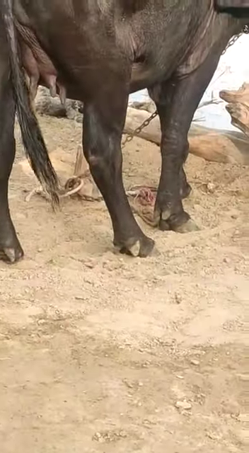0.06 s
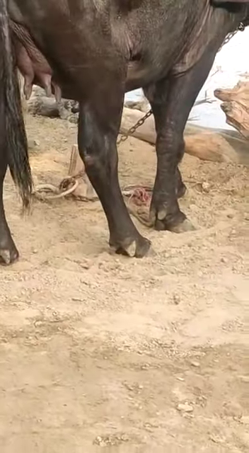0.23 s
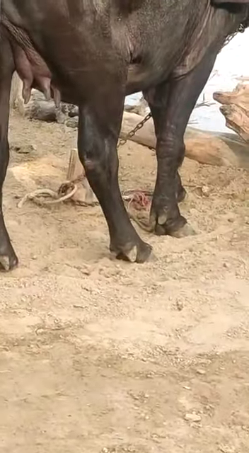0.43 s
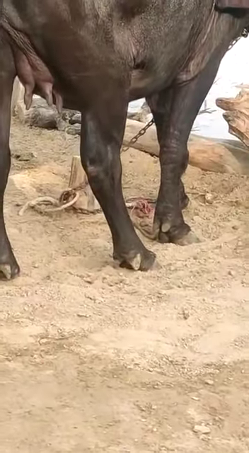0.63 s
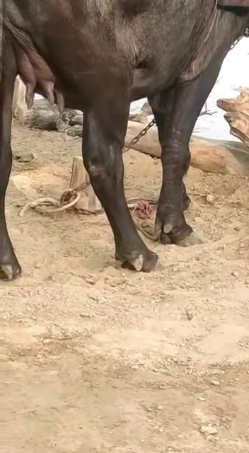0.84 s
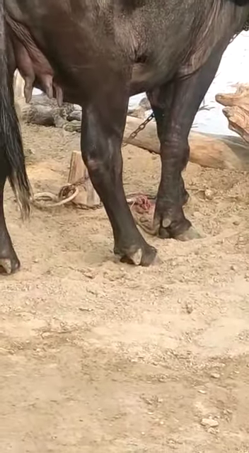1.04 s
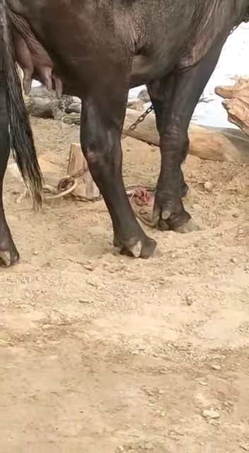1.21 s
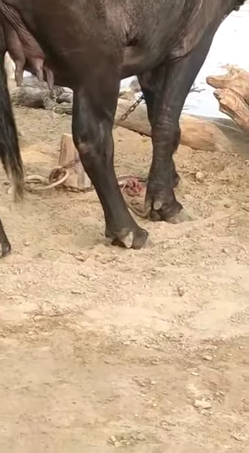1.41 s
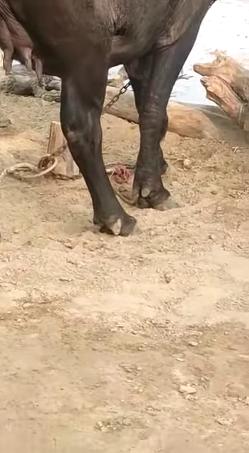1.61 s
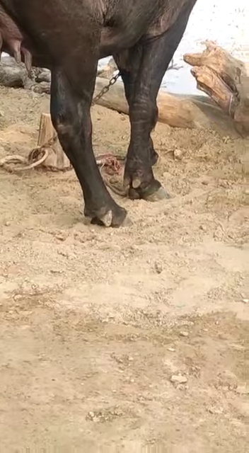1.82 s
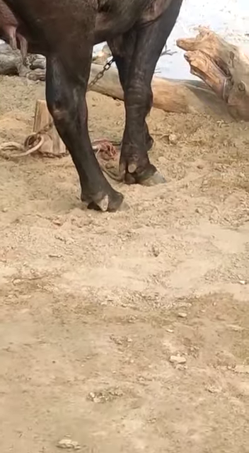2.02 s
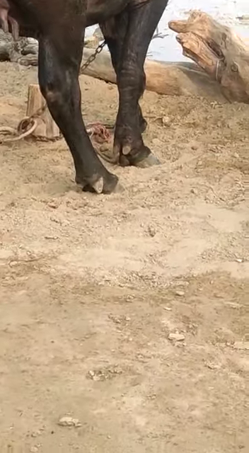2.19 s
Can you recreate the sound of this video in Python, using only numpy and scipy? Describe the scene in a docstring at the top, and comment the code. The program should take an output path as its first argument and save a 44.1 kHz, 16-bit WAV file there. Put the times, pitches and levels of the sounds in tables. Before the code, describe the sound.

A buffalo bellows once in an open yard, low and hoarse, briefly finding a clear pitch before breaking into rasping breath. Faint distant rumble and light wind on the microphone continue underneath, with two soft, dull thumps.

```python
"""One low, hoarse bellow from a tethered buffalo fills an open yard.
Its vocal folds flap unevenly into the resonances of throat and mouth, catch on a clear pitch midway,
then break up into rushing air. Walls throw the call back. Behind it are a distant outdoor rumble,
light wind on the microphone, a tiny tick, a scuff and two dull thumps."""
import sys
import numpy as np
from scipy import signal
from scipy.fft import rfft, irfft
from scipy.io import wavfile
from scipy.ndimage import uniform_filter1d

SR = 44100
rng = np.random.default_rng(int(sys.argv[2]) if len(sys.argv) > 2 else 0)


def int16_out(signal):
    """Quantize to a 16-bit WAV file."""
    q = np.round(np.clip(np.atleast_2d(signal).T, -1, 1) * 32767)
    wavfile.write(sys.argv[1], SR, q.astype(np.int16))


N = 103635
T = np.arange(N) / SR
FREQS = np.fft.rfftfreq(2 * N, 1 / SR)
AIR_SPREAD = 0.8   # side against mid amplitude of the breath

# Envelopes of the bellow's six bands. Each row: time in seconds, relative level in dB.
LOW_LEVEL = [(0.17, -59), (0.314, -37.5), (0.572, -36), (0.726, -37.5), (0.81, -33), (.88, -38.5),
             (.96, -33.5), (1.0, -38.5), (1.26, -40.5), (1.32, -52.5), (1.4, -40.5), (1.5, -46),
             (1.62, -60)]
MID_LEVEL = [(0.17, -65), (0.282, -41.5), (0.444, -37), (0.694, -35.5), (0.77, -29.5), (0.872, -41),
             (0.94, -37.5), (1.006, -40), (1.25, -42.5), (1.3, -42), (1.356, -38), (1.396, -52),
             (1.438, -49), (1.62, -72)]
HIGH_LEVEL = [(0.17, -75), (0.206, -51.5), (0.25, -39), (0.346, -32), (0.448, -34), (0.48, -29),
              (0.614, -36), (0.82, -40), (0.84, -37), (1.236, -36), (1.26, -39.5), (1.356, -37),
              (1.526, -50.5), (1.62, -64.5)]
RASP_LEVEL = [(0.17, -89), (0.246, -49), (0.33, -41), (0.362, -40.5), (0.392, -35), (0.512, -42.5),
              (0.586, -38), (0.726, -48), (0.904, -43), (1.13, -51.5), (1.174, -46.5), (1.478, -55.5),
              (1.62, -75.5)]
AIR_LEVEL = [(0.17, -70.5), (0.28, -48), (0.37, -49.5), (0.416, -56), (0.524, -45.5), (0.808, -58),
             (0.88, -45.5), (0.936, -64), (0.972, -48.5), (1.308, -51.5), (1.404, -54), (1.43, -48),
             (1.462, -59), (1.474, -49.5), (1.62, -83)]
HISS_LEVEL = [(0.17, -78), (0.298, -57), (0.71, -51.5), (0.792, -66.5), (0.86, -54.5), (0.928, -58),
              (1.078, -52), (1.202, -62), (1.295, -51), (1.316, -59.5), (1.404, -60), (1.439, -46.5),
              (1.458, -67), (1.49, -53.5), (1.51, -64), (1.62, -74)]
# Broad spectra of the same bands. Each row: frequency in Hz, relative gain in dB.
LOW_SHAPE = [(110, -11.5), (200, -7.5), (260, 1.5), (315, -5), (370, -17), (460, -17.5), (600, -57)]
MID_SHAPE = [(470, -31), (525, -8), (590, 1), (700, 5), (790, -12), (870, -11), (1050, -53)]
HIGH_SHAPE = [(680, -27), (800, -2), (900, -1), (1020, 3.5), (1100, -1), (1250, -1.5), (1430, -1.5),
              (1600, -8), (1850, -57)]
RASP_SHAPE = [(1400, -42), (1660, 3), (1850, 0.5), (2200, -1), (2380, -6.5), (2620, -19), (2950, -8.5),
              (3400, -35), (5000, -65)]
AIR_SHAPE = [(1200, 4), (2500, 0.5), (3100, 5), (3550, -2), (3950, 0.5), (4800, -3), (5800, -21.5),
             (6800, -48)]
HISS_SHAPE = [(5200, -9.5), (6200, -8.5), (7000, -2.5), (7700, -2), (8300, 2.5), (9000, 1), (9600, -4.5),
              (11000, -9.5), (13000, -13), (15000, -20)]
# Vibration of the vocal folds. Each row: time in seconds, pitch in Hz, clearness from 0 to 1.
FOLDS = [(.2, 136.2, 0), (.33, 140.4, 0.04), (.46, 142.6, 0.03), (.56, 137.7, 0.55), (.68, 138.7, 0.89),
         (.77, 138.6, 0.98), (.87, 136.7, 0.81), (.95, 137.9, 0.93), (1.0, 135.4, .2), (1.25, 140.5, 0.01),
         (1.36, 147.6, 0.14), (1.45, 149.1, 0.04)]
# Partials of the clear voice. Each row: harmonic number, relative level in dB.
LOW_PARTIALS = [(2, 0)]
MID_PARTIALS = [(4, -17), (5, 2)]
HIGH_PARTIALS = [(6, 4), (7, 1.5), (8, -8), (9, -11), (10, -2)]
# Rings of the throat (middle band, climbing as the mouth opens) and of the mouth (high band).
# Each row: time in seconds, centre in Hz, share of power against the rough voice from 0 to 1.
THROAT_RING = [(.25, 603, 0.6), (.38, 603, 0.7), (.46, 625, 0.48), (.57, 657, 0.7), (.68, 668, 0.6),
               (.8, 685, 0.22), (1.1, 692, 0.51), (1.29, 714, 0.71), (1.37, 703, 0.93), (1.5, 705, 0.2)]
MOUTH_RING = [(.26, 1005, 0.25), (.38, 945, 0.25), (.46, 930, 0.4), (.55, 928, 0.42), (.7, 949, 0),
              (.9, 1005, 0), (1.02, 1002, 0.22), (1.17, 1007, 0.5), (1.27, 1006, 0.07), (1.37, 1002, 0.34),
              (1.5, 1013, 0.14)]
# What the mouth passes of the hard slaps. Each row: frequency in Hz, gain in dB.
MOUTH_PASSBAND = [(500, -33), (700, 0), (3000, -0.5), (4000, -24)]
# Throb of the folds. Each row: time in seconds, modulation depth from 0 to 1.
GROWL_DEPTH = [(.4, .36), (.56, .3), (.8, .13), (1.05, .2)]
# Wheeze in the breath. Each row: time in seconds, centre in Hz, level in dB.
WHEEZE = [(.24, 6400, -69), (0.329, 6400, -53.5), (.45, 6490, -57.5), (0.499, 6500, -50.5),
          (.58, 5866, -60), (.68, 5780, -58), (.8, 5030, -64), (1.03, 5040, -57.5), (1.29, 4963, -56.5),
          (1.42, 4850, -62.5), (1.52, 4820, -75)]
# Brief overtones. Each row: peak time and half-length in seconds, centre and width in Hz, level in dB.
WHISTLES = [(0.323, 0.075, 895, 6.6, -39.5), (0.317, .04, 694, 6.6, -39), (0.358, 0.024, 1200, 9.5, -43),
            (0.455, 0.097, 778, 5.5, -37.5), (0.555, 0.048, 1421, 2.3, -52), (.95, 0.042, 692, 5.1, -38.5),
            (1.393, 0.042, 303, 5.4, -42), (1.439, 0.043, 1590, 11, -45.5), (1.428, 0.018, 8700, 260, -53),
            (1.483, 0.022, 8900, 190, -51)]
# Narrow, steady ringing pitches that reflections in the yard add to the bellow.
# Each row: centre in Hz, width in Hz, lift in dB.
YARD_RESONANCES = [(240.7, 6.7, 9), (279.3, 9.8, 9.5), (304.1, 5.2, 5.5), (605, 7.7, 7.5), (657, 9.5, 9.5),
                   (698.2, 8.8, 14), (772, 9.1, 6.5), (897, 11, 10), (954, 5.6, 7), (974, 7.9, 6),
                   (1012.7, 11.2, 11), (1124, 13, 9), (1438, 5.1, 8.5), (1895, 17, 10), (2128, 5.3, 10.5),
                   (2278, 10, 11)]
# Colour of the echoes, and of the call's left channel. Each row: frequency in Hz, gain in dB.
ECHO_SHAPE = [(250, -22.5), (600, -5.5), (1200, -2), (2500, 0.5), (5000, -0.5), (12000, -2)]
LEFT_LIFT = [(300, 0), (700, -0.5), (1100, 1.5), (2500, 0.5), (3100, -1), (4400, 3.5), (5600, 1.5),
             (7200, 3), (10000, 1)]
# Spectra of the scuff, the distant rumble, its side against its mid, and the wind.
# Each row: frequency in Hz, relative gain in dB.
SCUFF_SHAPE = [(300, -23), (650, 8), (1300, 2), (2500, -24), (8000, -39)]
RUMBLE_SHAPE = [(41, -13), (70, -2.5), (115, 2), (134, -9.5), (197, -5), (269, -13.5), (301, -15.5),
                (413, -13.5), (451, -25.5), (692, -27), (809, -27), (1700, -34), (2030, -40),
                (10200, -42.5), (15000, -50.5)]
RUMBLE_SIDE = [(70, -38), (250, -18.5), (700, -10), (2000, -1.5), (6000, 0)]
WIND_SHAPE = [(3, -44), (10, -9), (20, -3), (38, 6), (54, -4), (100, -32), (300, -67), (1000, -100)]
# Slow swell of the rumble. Each row: time in seconds, gain in dB.
RUMBLE_SWELL = [(0, 0.5), (1.75, 1), (2.35, -1)]
# Thumps on the microphone. Each row: start in seconds, peak before filtering in dB, rise in seconds.
THUMPS = [(1.0069, -23.5, 0.00089), (1.86, -34, 0.0097)]


def bellow():
    """Source and filter: the folds drive four voiced bands and pulse two bands of turbulent breath."""
    pitch, clear = in_time(FOLDS)
    source, gate = rough_folds(pitch, clear)
    low, mid, high, rasp = vocal_tract(yard_colour(source), pitch, clear)
    airflow = gate * stereo(rng.standard_normal(N), AIR_SPREAD * rng.standard_normal(N))
    air, hiss = [evened(coloured(airflow, shape)) for shape in (AIR_SHAPE, HISS_SHAPE)]
    bands = [(low, LOW_LEVEL, -0.5), (mid, MID_LEVEL, 1), (high, HIGH_LEVEL, -0.5),
             (rasp, RASP_LEVEL, -0.5), (air, AIR_LEVEL, 0), (hiss, HISS_LEVEL, 0)]
    return sum(from_db(trim_db) * envelope(level) * band for band, level, trim_db in bands) + wheeze(gate)


def rough_folds(pitch, clear, jitter=0.3, slap_s=0.0018, flutter_db=2):
    """Aperiodic vibration: uneven slaps gate puffs of turbulence. Returns the sound and the gate."""
    cycles = np.cumsum(pitch * np.exp(jitter * (1 - clear / 2) * drift(90))) / SR
    slaps = np.diff(np.floor(cycles), prepend=0)
    puffs = unit_power(lowpass(slaps, 1 / (2 * np.pi * slap_s)))
    gate = (1 + 0.64 * puffs) * from_db(flutter_db * drift(53))
    turbulence = unit_power(gate * rng.standard_normal(N))
    return unit_power(slaps) + turbulence, gate


def vocal_tract(source, pitch, clear):
    """Resonance shapes the slaps into four bands; the lower three give way to rings or clear partials."""
    shapes = (LOW_SHAPE, MID_SHAPE, HIGH_SHAPE, RASP_SHAPE)
    low, mid, high, rasp = [evened(coloured(source, shape)) for shape in shapes]
    low_tone, mid_tone, high_tone = clear_folds(pitch)
    throat_hz, throat_share = in_time(THROAT_RING)
    mouth_hz, mouth_share = in_time(MOUTH_RING)
    low = blend(low, low_tone, clear)
    mid = blend(mid, ringing(throat_hz, width_hz=7.3), throat_share)
    mid = blend(mid, mid_tone, clear ** 4)
    high = blend(high, ringing(mouth_hz, width_hz=5.1), mouth_share)
    high = blend(high, high_tone, 0.55 * clear ** 2)
    return growl(pitch) * np.array([low, mid, rounded(high), rounded(rasp)])


def clear_folds(pitch, waver=0.0039, sag_share=0.065, sag_at_s=0.83, sag_width_s=0.05):
    """Periodic vibration gives three groups of harmonics; the highest sags out of tune midway."""
    phase = 2 * np.pi * np.cumsum(pitch * (1 + waver * drift(23.36))) / SR
    sag = sag_share * (1 + np.tanh((T - sag_at_s) / sag_width_s)) / 2
    sagging = phase - 2 * np.pi * np.cumsum(pitch * sag) / SR
    groups = [(LOW_PARTIALS, phase), (MID_PARTIALS, phase), (HIGH_PARTIALS, sagging)]
    return [unit_power(sum(from_db(db) * np.sin(k * angle) for k, db in partials))
            for partials, angle in groups]


def rounded(band, limit=2.2):
    """Saturation rounds the hardest slaps, and the mouth band-limits the result."""
    return coloured(evened(np.tanh(band / limit)), MOUTH_PASSBAND)


def growl(pitch, throbs_per_cycle=0.29, jitter=0.24):
    """Amplitude modulation: a gain that makes the folds slap hardest every fourth cycle or so."""
    phase = 2 * np.pi * np.cumsum(throbs_per_cycle * pitch * np.exp(jitter * drift(23.2))) / SR
    depth = in_time(GROWL_DEPTH)[0]
    return (1 + depth * np.cos(phase)) / np.sqrt(1 + depth ** 2 / 2)


def wheeze(gate, width_hz=920):
    """A heavily damped resonance of the breath sinks in frequency, pulsed by the folds."""
    hz = in_time(WHEEZE)[0]
    air = stereo(ringing(hz, width_hz), AIR_SPREAD * ringing(hz, width_hz))
    return envelope([(s, db) for s, _, db in WHEEZE]) * evened(gate * air)


def whistles():
    """Narrow resonances flare up within the call, each under a Gaussian envelope."""
    return sum(from_db(db) * np.exp(-((T - peak_s) / half_length) ** 2) * ringing(hz, width)
               for peak_s, half_length, hz, width, db in WHISTLES)


def ringing(hz, width_hz):
    """A resonance stirred by turbulence gives narrow-band noise, whose centre may move."""
    amplitude = drift(width_hz) + 1j * drift(width_hz)
    carrier = np.exp(2j * np.pi * np.cumsum(hz * np.ones(N)) / SR)
    return evened((amplitude * carrier).real)


def yard_colour(source):
    """Interference of the yard's reflections lifts narrow, steady pitches, modelled as resonances."""
    lifts = sum((from_db(db) - 1) * resonance(hz, width) for hz, width, db in YARD_RESONANCES)
    return filtered(source, 1 + lifts)


def yard(call, t60_s=0.095, echo_delay_s=0.0026, left_lag_s=0.00006):
    """Reflection: a short scatter off walls and ground follows the slightly off-centre direct sound."""
    scatter = rng.standard_normal((2, N)) * from_db(-60 * T / t60_s) * (T > echo_delay_s)
    mid, side = scatter / np.sqrt(np.sum(scatter ** 2, axis=1, keepdims=True))
    impulse_response = stereo(from_db(-4) * mid, from_db(-5.5) * side)
    left_echo, right_echo = coloured(filtered(call, rfft(impulse_response, 2 * N)), ECHO_SHAPE)
    left_direct = filtered(call[0], np.exp(-2j * np.pi * FREQS * left_lag_s))
    return np.array([coloured(left_direct + left_echo, LEFT_LIFT), call[1] + right_echo])


def thumps():
    """Critically damped pulses on the microphone sound dull; a 25 Hz high-pass removes their offset."""
    pulses = np.zeros(N)
    for start_s, db, rise_s in THUMPS:
        age = np.maximum(T - start_s, 0) / rise_s
        pulses += from_db(db) * age * np.exp(1 - age)
    return signal.sosfilt(signal.butter(1, 25, "high", fs=SR, output="sos"), pulses)


def tick(start_s=0.1563, decay_s=0.00061):
    """A noise burst with fast exponential decay is heard as a tiny tick before the call."""
    burst = rng.standard_normal(N) * (T > start_s) * np.exp(-np.abs(T - start_s) / decay_s)
    return from_db(-40.5) * lowpass(burst, hz=4450)


def scuff(peak_s=1.868, half_length_s=0.022):
    """Friction in the dirt gives a soft swell of noise after the call."""
    friction = unit_power(coloured(rng.standard_normal(N), SCUFF_SHAPE))
    return from_db(-63.5) * friction * np.exp(-((T - peak_s) / half_length_s) ** 2)


def distant_rumble():
    """Outdoor noise, coherent between the channels in the bass and diffuse in the treble."""
    mid, side = coloured(rng.standard_normal((2, N)), [(30, -53)] + list(RUMBLE_SHAPE))
    rumble = unit_power(stereo(mid, coloured(side, RUMBLE_SIDE)))
    return from_db(-49.5 + in_time(RUMBLE_SWELL)[0]) * rumble


def wind():
    """Turbulent pressure on the microphone gives lumpy, very low noise."""
    mid, side = coloured(rng.standard_normal((2, N)), WIND_SHAPE)
    return from_db(-48) * unit_power(stereo(mid, from_db(-3) * side))


def from_db(db):
    """Amplitude grows tenfold every 20 dB."""
    return 10 ** (np.asarray(db) / 20)


def unit_power(x):
    """Division by the RMS gives unit power."""
    return x / np.sqrt(np.mean(x ** 2) + 1e-20)


def evened(x, size=1200):
    """Division by the running RMS holds short-term power near 1."""
    return x / np.sqrt(uniform_filter1d(uniform_filter1d(x ** 2, size), size) + 1e-12)


def blend(a, b, share):
    """Uncorrelated sounds add by power; the mix is held level."""
    return evened(np.sqrt(1 - share) * a + np.sqrt(share) * b)


def in_time(rows):
    """Linear interpolation gives each column of a curve at every sample."""
    times, *columns = np.transpose(rows)
    return [np.interp(T, times, column) for column in columns]


def envelope(rows, fade_s=0.041):
    """Gain of a level curve, with exponential decay beyond its ends."""
    outside_s = np.maximum(rows[0][0] - T, 0) + np.maximum(T - rows[-1][0], 0)
    return from_db(in_time(rows)[0]) * np.exp(-outside_s / fade_s)


def filtered(x, response):
    """Convolution is multiplication of spectra."""
    return irfft(rfft(x, 2 * N) * response)[..., :N]


def coloured(x, shape):
    """Filter by (Hz, dB) points joined on a logarithmic frequency axis."""
    hz, db = np.transpose(shape)
    return filtered(x, from_db(np.interp(np.log(FREQS + 1), np.log(hz), db)))


def lowpass(x, hz):
    """Two poles take off 12 dB per octave above the corner."""
    return filtered(x, 1 / (1 + 1j * FREQS / hz) ** 2)


def resonance(hz, width_hz):
    """Response of a damped oscillator, 1 at its peak."""
    return 1j * FREQS * width_hz / (hz ** 2 - FREQS ** 2 + 1j * FREQS * width_hz)


def drift(rate_hz):
    """Low-passed noise wanders at random with unit power."""
    return unit_power(lowpass(rng.standard_normal(N), rate_hz))


def stereo(mid, side):
    """Sum and difference give left and right."""
    return np.array([mid + side, mid - side])


def scene():
    """Superposition of the bellow in its yard, the small noises and the background."""
    return yard(bellow() + whistles()) + thumps() + tick() + scuff() + distant_rumble() + wind()


def record(dry, cutoff_hz=14900):
    """A steep low-pass limits the bandwidth."""
    return filtered(dry, 1 / np.sqrt(1 + (FREQS / cutoff_hz) ** 300))


dry = scene()
out = record(dry)
int16_out(out)
```